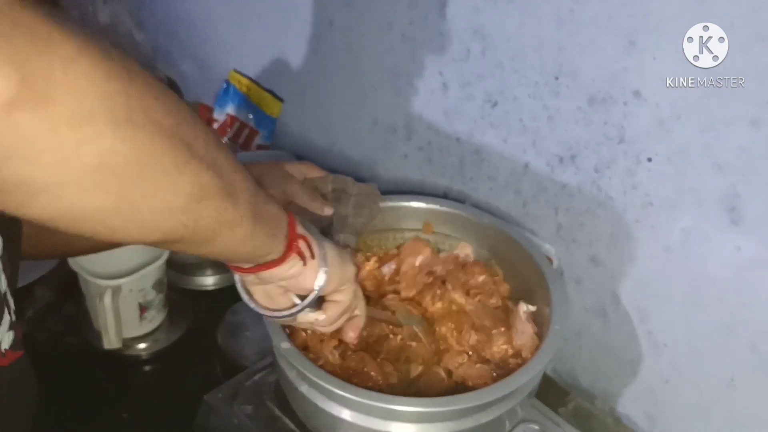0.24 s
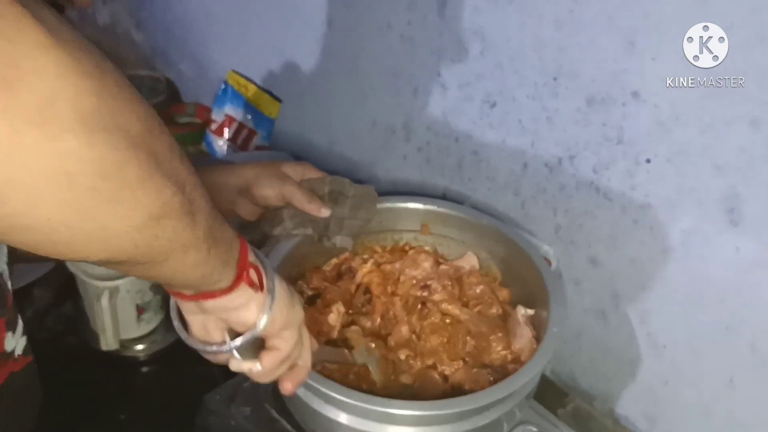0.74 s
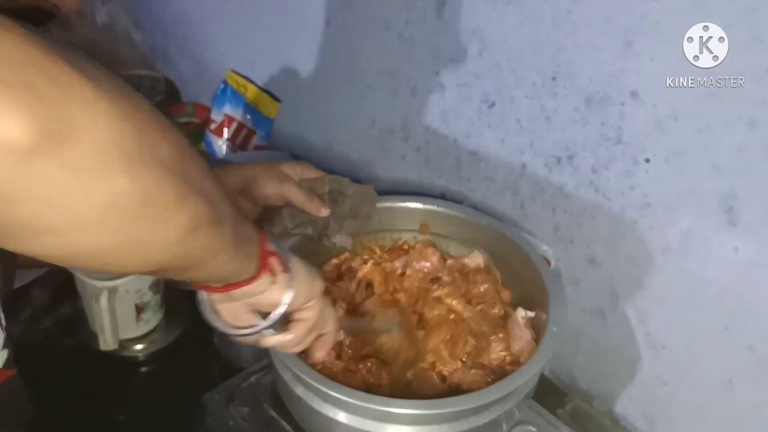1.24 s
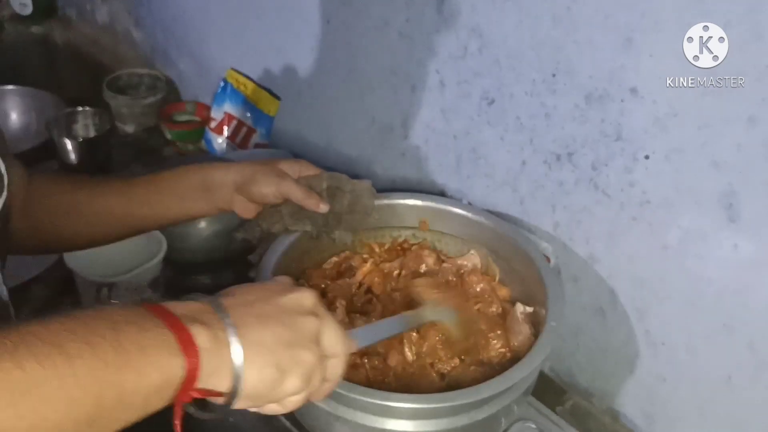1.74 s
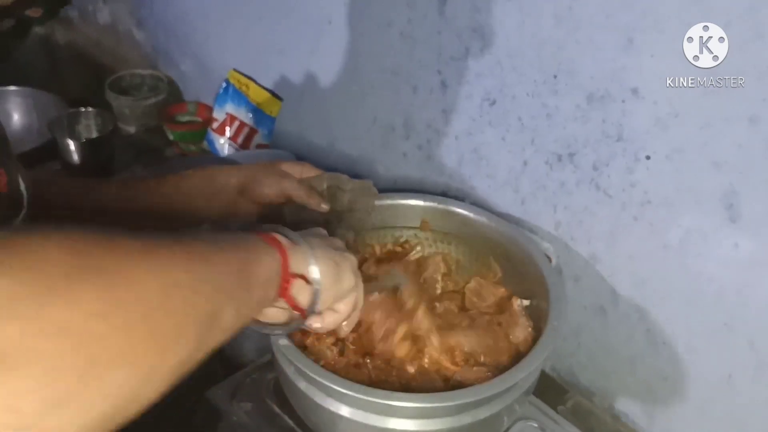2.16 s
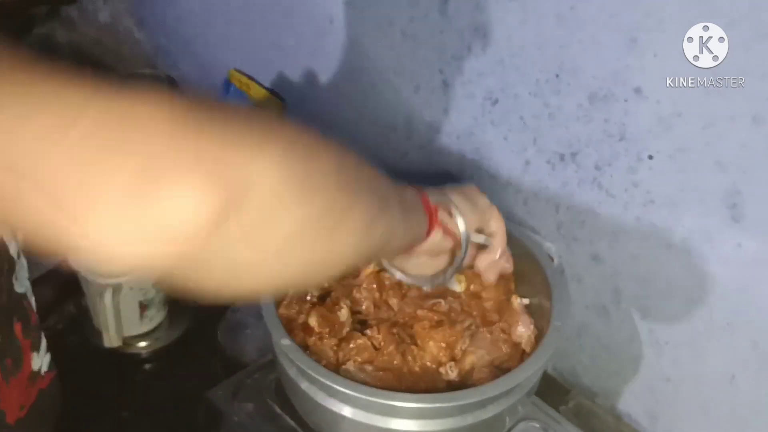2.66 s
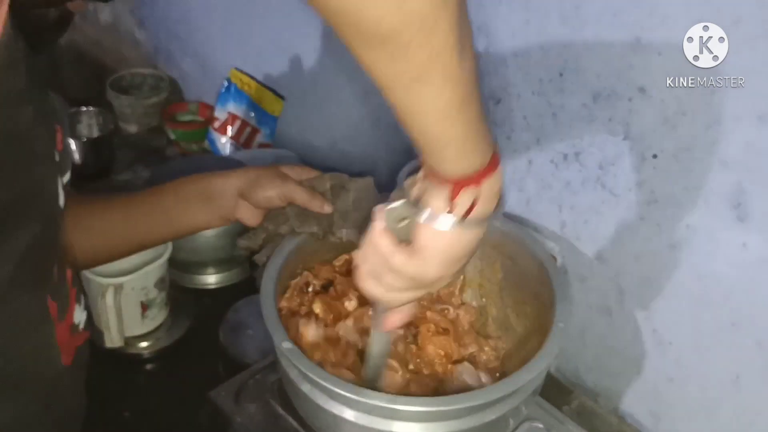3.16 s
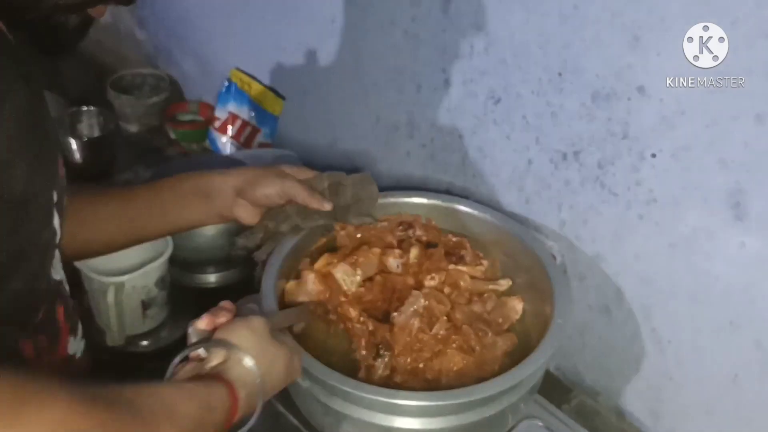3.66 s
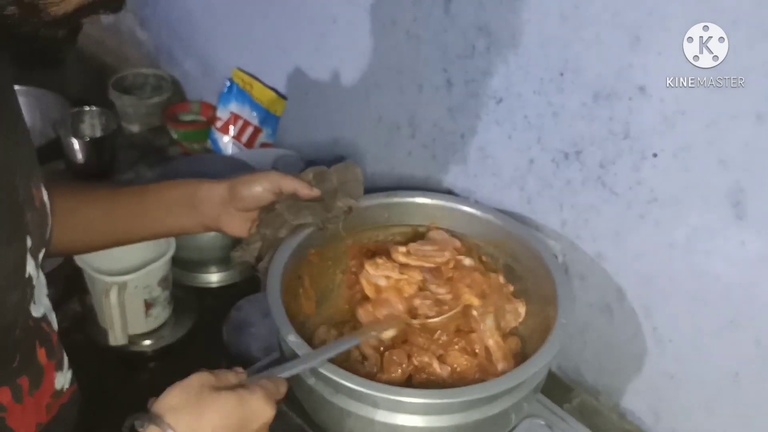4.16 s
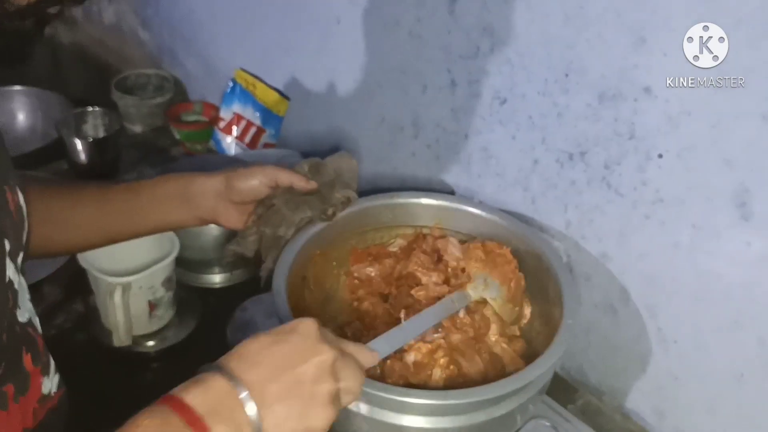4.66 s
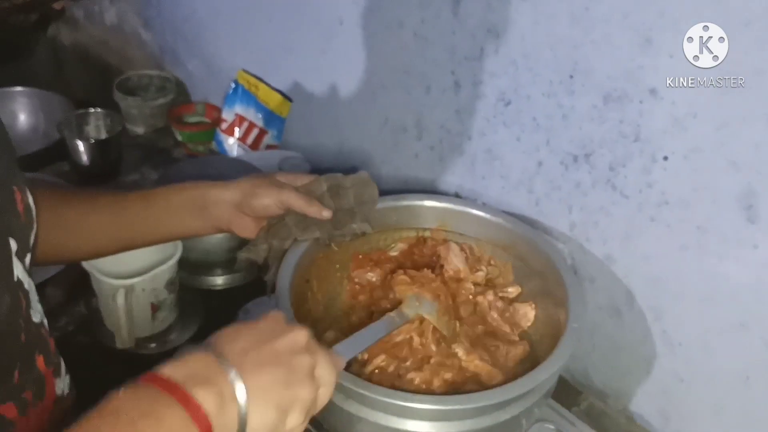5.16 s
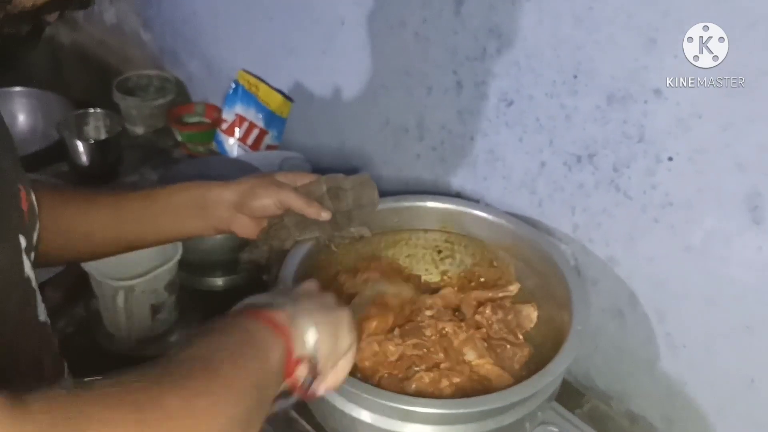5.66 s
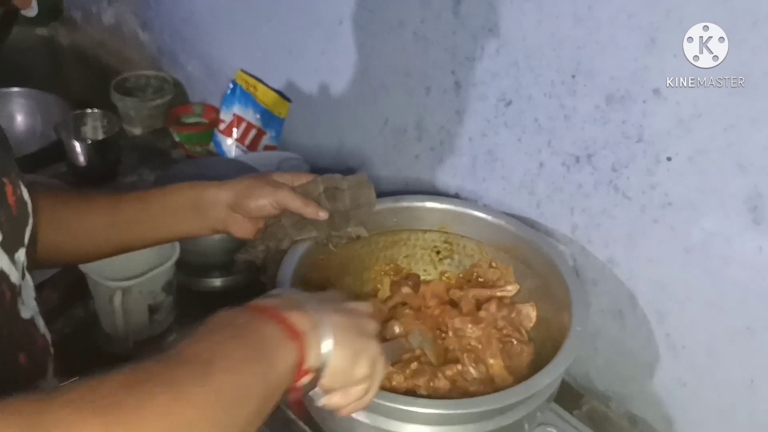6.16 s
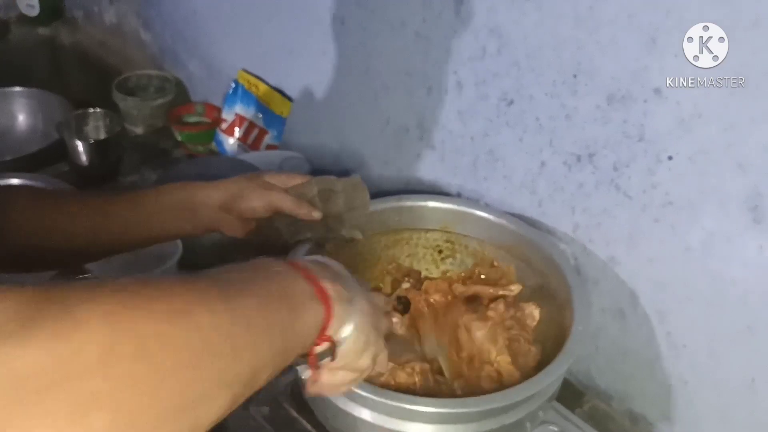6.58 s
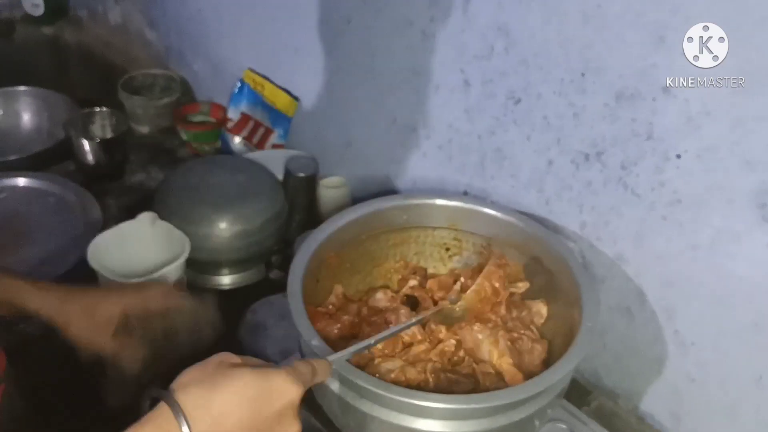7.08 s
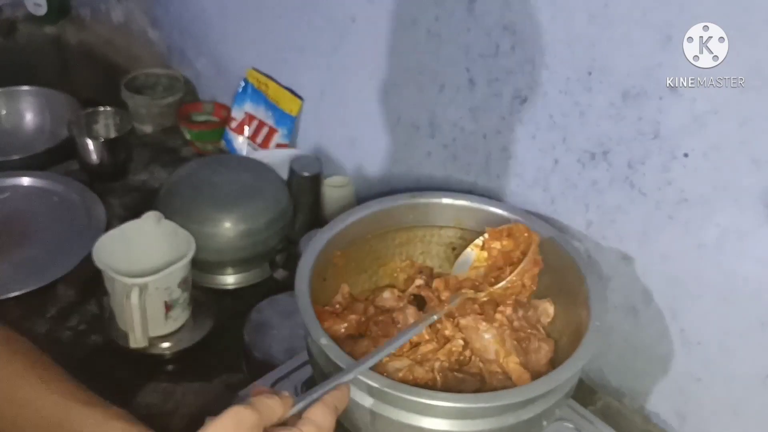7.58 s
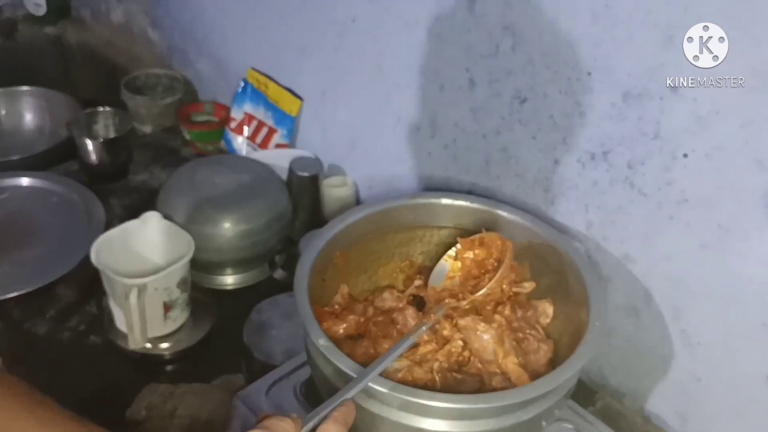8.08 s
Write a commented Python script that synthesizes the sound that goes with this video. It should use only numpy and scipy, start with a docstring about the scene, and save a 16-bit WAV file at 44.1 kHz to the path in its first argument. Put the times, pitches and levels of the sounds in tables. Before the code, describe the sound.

Brisk metallic scraping and clanks as saucy meat is stirred in a large pot, with wet smacks, easing to near quiet in a small kitchen.

```python
"""Ladle stirring a pot of chicken

A steel ladle stirs wet chicken pieces round a large aluminium pot in a small, hard-walled kitchen.
Its edge grates (stick-slip clicks through the pot's modes), clinks and knocks on the wall (struck modes, rattle).
The sauce squelches and smacks (pops of rising pitch); the dragged bowl sings (friction-driven resonances).
At the end the ladle is laid on the food, over a faint simmer (shaped noise and crackle)."""
import sys
import numpy as np
from scipy import signal
from scipy.io import wavfile
from scipy.ndimage import uniform_filter1d

SR = 44100
rng = np.random.default_rng(int(sys.argv[2]) if len(sys.argv) > 2 else 0)


def transcribe(u):
    """Save the signal u as a 16-bit wav file named by the first command-line argument.

    u: samples, shape (n,) or (channels, n), limited to [-1, 1]; the rate is SR.
    q: integer samples, one column per channel.
    """
    v = np.clip(np.atleast_2d(u).T, -1, 1)
    q = np.round(v * 32767).astype(np.int16)
    wavfile.write(sys.argv[1], SR, q)


N = 367353
TIME = np.arange(N) / SR
RING = np.arange(SR // 2) / SR

# ladle against pot wall: t/s, rasp level/dB, boom re rasp/dB, edge re rasp/dB, thud f/Hz,
# rattle re blow/dB, rattle decay/s, rise/s, treble limit f/Hz, wall clang re rasp/dB
KNOCKS = [(0.091, -37, -14, 4, 490, 2, 0.031, .0003, 13000, -17),
          (2.190, -38, -25.5, 8.5, 930, -8.5, 0.017, 0.00041, 5850, -23),
          (2.3671, -40, 0, 7.5, 900, -20, 0.033, 0.00058, 4800, -23.5),
          (2.729, -29, -3, 9, 303, 1.5, 0.069, 0.00014, 12000, -6),
          (3.474, -24.5, -0.5, 0.5, 890, -29.5, .01, 0.0001, 7500, -18),
          (4.023, -47, 4, -21, 414, 3, 0.0093, 0.00078, 4970, -31),
          (4.536, -40.5, -9, -2.5, 685, -20, 0.01, .0005, 5030, -16.5),
          (5.22, -33, -2, -7.5, 670, 6, 0.024, .0006, 4930, -10),
          (6.2629, -37.5, -7.5, 6, 740, 0, 0.044, 0.00067, 4940, -16),
          (6.335, -28, 8, -12.5, 433, -9.5, 0.0067, 0.0018, 6000, -18.5),
          (6.6944, -28.5, 2.5, -6, 323, 0, 0.051, 0.0037, 10460, -6),
          (6.997, -47.5, -13, 0, 800, 0, 0.014, .0004, 7000, -10.5),
          (7.6979, -39, -0.5, -1, 328, -3, 0.021, 0.004, 5600, 0.5),
          (8.055, -53.5, -2, -4, 950, 4, 0.041, 0.0031, 3620, 1)]
# ladle modes: f/Hz, level/dB, t60/s
LADLE_MODES = [(3090, -25.5, 0.13), (3680, -9, 0.021), (4050, 7, 0.0089), (4413, 15, 0.0056),
               (4520, 1.5, 0.0038), (5670, -22, 0.067), (6800, -14, 0.0079), (9380, -18.5, 0.016),
               (8890, -11.5, 0.018), (12650, -41.5, 0.07)]


def gain_of(db):
    """Decibels to gain."""
    return 10 ** (np.asarray(db) / 20)


def evened(x):
    """Scales to rms 1."""
    return x / np.sqrt(np.mean(x ** 2) + 1e-20)


def read(points, hz):
    """Reads a curve on a log-frequency axis."""
    f, value = np.transpose(points)
    return np.interp(np.log(hz + 1), np.log(f + 1), value)


def add(mix, s, sound):
    """Adds a sound at time s."""
    part = mix[max(round(s * SR), 0):][:len(sound)]
    part += sound[:len(part)]


def through(x, response):
    """Convolves and keeps the length."""
    return signal.oaconvolve(x, response)[:len(x)]


def click(colour, size=4096):
    """Causal minimum-phase click whose level in dB is colour(Hz)."""
    hz = abs(np.fft.fftfreq(size, 1 / SR))
    log_gain = np.log(gain_of(np.maximum(colour(hz), -110)))
    spectrum = np.exp(np.conj(signal.hilbert(log_gain)))
    return np.fft.ifft(spectrum).real[:size // 2]


def flutter(db, size):
    """Random gain, sd db, interpolated between new values every size samples."""
    knots = np.arange(0, N + size, size)
    values = gain_of(db * np.clip(rng.standard_normal(len(knots)), -2, 2))
    return np.interp(np.arange(N), knots, values)


def grains(per_s, spread_db):
    """Random clicks with exponentially spread dB levels, rms 1 overall."""
    place, size, sign = rng.random((int(per_s * N / SR) + 1, 3)).T
    height = gain_of(spread_db * np.minimum(-np.log(1 - size), 4)) * np.sign(sign - .5)
    return evened(np.bincount((place * N).astype(int), height, N))


def chatter(decay_s, rise_s=0.0013):
    """A dying rattle of tiny contacts, as enveloped noise."""
    envelope = np.exp(-RING / max(decay_s, 1e-4)) * (1 - np.exp(-RING / rise_s))
    return rng.standard_normal(len(RING)) * envelope


def mode(hz, t60):
    """One dying vibration."""
    return np.exp(-np.log(1000) * RING / t60) * np.cos(2 * np.pi * hz * RING)


def struck(modes, split=0, count=1):
    """Modes of one object with random signs; an uneven wall splits each into a few close ones."""
    total = 0
    for hz, db, t60 in modes:
        for _ in range(count):
            sign = np.sign(rng.random() - .5)
            total = total + sign * gain_of(db) * mode(hz * (1 + split * rng.uniform(-1, 1)), t60)
    return total / np.sqrt(count)


def rung(x, hz, width_hz):
    """One broad resonance."""
    return signal.lfilter(*signal.iirpeak(min(hz, SR / 3), hz / width_hz, fs=SR), x)


def fuzzy_tone(drive, hz, width_hz):
    """A resonance kept going by friction: double complex pole, rms 1."""
    r = np.exp(-np.pi * width_hz / SR + 2j * np.pi * hz / SR)
    return evened(signal.lfilter([1], np.poly([r, r]), drive).real)


def singing(hz, waver, size=500):
    """A clean tone whose pitch wavers a little."""
    drift = np.log(flutter(20 / np.log(10), size))
    return np.sqrt(2) * np.sin(2 * np.pi * np.cumsum(hz * (1 + waver * drift)) / SR)


def pop(hz, cycles, swell=1.0):
    """A short blip: a few cycles of rising pitch that swell and die, peak 1."""
    turns = hz * RING[:2000]
    dying = np.exp(-turns / cycles)
    swelling = 1 - np.exp(-turns / (swell * cycles))
    wave = dying * swelling * np.sin(2 * np.pi * turns * (1 + 0.054 * (1 - dying)))
    return wave / abs(wave).max()


def pushes(rows, attack_s, release_s, sag_db_per_s=4.5):
    """Gain of pushes (t/s, length/s, level/dB): each builds up, eases as the food gives way, lets go."""
    out = np.zeros(N)
    for s, length, db in rows:
        t = np.arange(0, length + 8 * release_s, 1 / SR)
        hold = gain_of(db - sag_db_per_s * t)
        release = np.exp(-np.maximum(t - length, 0) / release_s)
        add(out, s, hold * np.minimum(t / attack_s, 1) * release)
    return out


def stirring_force():
    """Force of the strokes on boom, rasp and bright edge: quick to and fro, then slow sweeps."""
    # t/s, length/s, rasp level/dB, boom re rasp/dB, edge re rasp/dB
    strokes = [(0.0, 0.087, -29, 1.5, -4), (0.142, 0.067, -26, 1, -5.5), (0.286, 0.07, -28, -4.5, -4),
               (0.38, 0.11, -37.5, 6, -5.5), (0.478, 0.078, -31, -3.5, -3.5), (0.607, 0.048, -32, 1.5, -3),
               (0.672, 0.02, -25.5, 1.5, -6.5), (0.733, 0.027, -34, 5, -2), (0.805, 0.075, -31, 2, -9.5),
               (0.961, 0.12, -31, 1.5, -3.5), (1.099, 0.091, -30, 0, -3), (1.256, 0.17, -31.5, 0, -1),
               (1.419, 0.049, -27.5, -1, -11), (1.526, 0.071, -30.5, -3, -5), (1.616, 0.041, -49, 11.5, -9),
               (1.679, 0.042, -39, 3, -6), (2.057, 0.15, -49.5, -16.5, 5.5), (2.221, 0.13, -47.5, 2.5, 5),
               (2.383, 0.079, -56, 9.5, 5), (2.906, 0.12, -43, 8, 8.5), (3.015, 0.04, -45.5, 13, 16),
               (3.047, 0.092, -41.5, 11, 2.5), (3.146, 0.12, -36.5, 9.5, 7.5),
               (3.301, 0.099, -39.5, 9, 10.5), (3.375, 0.03, -38.5, 10, -9), (3.42, 0.19, -33, 1.5, -1.5),
               (3.635, 0.46, -50, 4, 4.5), (4.073, 0.39, -44, 6, -1.5), (4.376, 0.11, -49.5, -15, 2),
               (5.124, 0.073, -62.5, -12, 12), (5.223, 0.078, -48, 13.5, 7), (5.579, 0.38, -48.5, 0, 4.5),
               (5.697, 0.025, -45.5, 8, -14.5), (5.802, 0.1, -72, -6, 22), (6.475, 0.12, -41, -3, -2),
               (6.712, 0.063, -48, 16.5, 8.5), (6.85, 0.081, -64.5, 1, 13)]
    s, length, db, boom_db, edge_db = np.transpose(strokes)
    return [pushes(zip(s, length, db + part), attack_s=0.02, release_s=0.026)
            for part in (boom_db, 0, edge_db)]


def pot_voices(low_hz=1000, high_hz=2800):
    """The pot's answer to one tap, split into boom, rasp and edge, each of energy 1."""
    # loaded pot modes: f/Hz, height/dB, t60/s
    pot_modes = [(121, 19, 0.39), (272.7, 9.5, 0.45), (345.6, 3.5, 0.19), (410.3, 2.5, 0.074),
                 (508.5, 3.5, 0.34), (608, 4.5, 0.44), (834, 1.5, 0.035), (1000, -8, 0.19),
                 (1346, -9.5, 0.082), (2294, 1.5, 0.13)]
    # colour of steel on aluminium: f/Hz, level/dB
    contact_colour = [(30, -41), (90, -22), (190, -3), (290, 2), (420, 1), (620, -3.5), (950, -1.5),
                      (1500, 0.5), (3100, -3), (4350, 3.5), (5300, -8.5), (7200, -10), (9500, -28.5),
                      (14000, -38.5)]
    ring = sum(gain_of(db) * 2 * np.log(1000) / (t60 * SR) * mode(hz, t60) for hz, db, t60 in pot_modes)
    ring[0] += 1  # direct tap

    def below(f, corner, order=8):
        """Low-pass power share."""
        return 1 / (1 + (f / corner) ** order)

    shares = [lambda f: below(f, low_hz),
              lambda f: below(f, high_hz) * (1 - below(f, low_hz)),
              lambda f: 1 - below(f, high_hz)]
    voices = [through(ring, click(lambda f: read(contact_colour, f) + 10 * np.log10(share(f) + 1e-12)))
              for share in shares]
    return [v / np.linalg.norm(v) for v in voices]


def scraping(voices, forces, boom_db=-1.0, rasp_db=0.0, edge_db=0.0,
             uneven_db=1.5, wander_db=6, pitched=0.72, clump_db=1.5):
    """The edge sticks and slips in clumps; as the contact shifts, each clump favours other pitches."""
    slips = evened(grains(per_s=1100, spread_db=3.8) * flutter(uneven_db, size=300))
    shifting = np.zeros(N)
    for hz in np.geomspace(250, 11000, num=24):
        clumps = grains(per_s=380, spread_db=4) * flutter(wander_db, size=700)
        shifting += rung(clumps, hz, 40 + .07 * hz)
    shifting = shifting * flutter(clump_db, size=260)
    out = np.zeros(N)
    for voice, force, db in zip(voices, forces, (boom_db, rasp_db, edge_db)):
        level = np.std(through(shifting[:N // 2], voice))
        drive = np.sqrt(1 - pitched) * slips + np.sqrt(pitched) * shifting / level
        out += gain_of(db) * through(drive * force, voice)
    return out


def knocking(voices, contact_s=.0042, rebound_s=0.011, blow_s=0.022, thud_width_hz=350,
             rattle_boom_db=3.5, clang_rise_s=.003, clang_split=.04, uneven_db=2.0):
    """Blows land, rebound and rattle; the wall clangs; food in the way slows and dulls the contact."""
    # bare wall above the food: f/Hz, level/dB, t60/s
    wall_modes = [(607, -10.5, .25), (915, -10.5, 0.37), (1088, -4.5, 0.47), (1374, -4, 0.41),
                  (1620, -11.5, 0.24), (2025, 1.5, 0.24), (2196, 0.5, 0.38), (2400, -5, 0.22),
                  (2620, -0.5, 0.21), (3200, -9.5, .18), (4650, -11, .15), (5050, -7, 0.27)]
    out = np.zeros(N)
    for s, db, boom_db, edge_db, thud_hz, rattle_db, rattle_s, rise_s, top_hz, clang_db in KNOCKS:
        cushion = signal.butter(4, min(top_hz, SR / 3), fs=SR)
        touches = [(0, contact_s, 0, 0), (rebound_s, rattle_s, rattle_db, rattle_boom_db)]
        for delay, decay_s, touch_db, heavy_db in touches:
            unevenness = flutter(uneven_db, size=260)[:len(RING)] if delay else 1
            contacts = signal.lfilter(*cushion, chatter(decay_s, rise_s) * unevenness)
            # landing place sets the thud pitch
            drives = [contacts + 2 * rung(contacts, thud_hz, thud_width_hz), contacts, contacts]
            for drive, voice, part_db in zip(drives, voices, (boom_db + heavy_db, 0, edge_db)):
                blow = through(drive, voice)
                blow *= np.sqrt(blow_s * SR) / np.linalg.norm(blow)
                add(out, s + delay, gain_of(db + touch_db + part_db) * blow)
        clang = struck(wall_modes, clang_split, count=8) * (1 - np.exp(-RING / clang_rise_s))
        add(out, s, gain_of(db + clang_db) * clang)
    return out


def heaving(level_db=1, hz=215, t60=0.095, full_db=-21, steep=3.3, rise_s=0.0058):
    """Heavy blows also shove the whole loaded pot: one short, deep thump."""
    out = np.zeros(N)
    high_pass = signal.butter(3, 0.34 * hz, "high", fs=SR)
    thump = signal.lfilter(*high_pass, mode(hz, t60) * (1 - np.exp(-RING / rise_s)))
    for s, db, boom_db, *_ in KNOCKS:
        add(out, s, gain_of(level_db + full_db + steep * (db + boom_db - full_db)) * thump)
    return out


def clinking(voices, level_db=-1, rebound_s=0.0044, rebound=0.37, crack_s=0.0044, rim_hz=6660, rim_t60=0.13):
    """The caught edge rings the ladle, cracks on the pot and rebounds once; sauce damps it quickly."""
    # t/s, level/dB, rim ping/dB, crack re ring/dB
    clinks = [(0.277, -20.5, -31.5, -9), (0.728, -1.5, -44.5, -12), (1.052, -6, -16, -7),
              (1.1205, -10, -35, -5), (1.3512, -3, -12.5, -4), (3.23, -24.5, -45, -3),
              (3.2417, -10.5, -38.5, 2.5), (3.311, -12.5, -26, 5.5), (6.15, -28.5, -36.5, -17),
              (6.261, -26.5, -35.5, 3)]
    out = np.zeros(N)
    for s, db, ping_db, crack_db in clinks:
        ring = struck(LADLE_MODES) + gain_of(ping_db) * mode(rim_hz, rim_t60)
        ring *= 1 - np.exp(-RING / 0.0009)
        crack = through(chatter(crack_s), voices[2] + .5 * voices[1])
        hit = ring / abs(ring).max() + gain_of(crack_db) * crack / abs(crack).max()
        hit *= gain_of(db + level_db) / abs(hit).max()
        add(out, s, hit)
        add(out, s + rebound_s, rebound * hit * np.exp(-RING / 0.0051))
    return out


def skidding(voices, level_db=0, grit_db=-3):
    """The edge skids over bare metal: a fast run of slips rings the ladle and grates on the pot."""
    # t/s, length/s, level/dB
    skids = [(0.0, 0.02, -24), (0.325, 0.035, -45.5), (0.687, 0.008, -37.5), (0.709, 0.004, -32),
             (1.4, 0.013, -36), (2.936, 0.012, -27.5), (3.2, 0.012, -32.5), (6.543, 0.012, -40.5),
             (6.672, 0.014, -42)]
    ring = struck(LADLE_MODES) * (1 - np.exp(-RING / .001)) ** 2
    slips = grains(per_s=1800, spread_db=2.5) * pushes(skids, attack_s=.003, release_s=.004)
    return gain_of(level_db) * through(slips, ring / np.linalg.norm(ring) + gain_of(grit_db) * voices[2])


def thinned_when_faint(x, full_db, slope, corner_hz=5000, deep_hz=210, deep_slope=.6):
    """Faint contact sounds duller and thinner: top treble and deepest boom fade as the level falls."""
    dull = signal.sosfiltfilt(signal.butter(6, corner_hz, fs=SR, output="sos"), x)
    deep = signal.sosfiltfilt(signal.butter(4, deep_hz, fs=SR, output="sos"), x)
    local_rms = np.sqrt(abs(uniform_filter1d(x ** 2, size=400)) + 1e-14)
    level = np.minimum(local_rms / gain_of(full_db), 1)
    return dull - deep + (x - dull) * level ** slope + deep * level ** deep_slope


def rubbing(drag_db=-2, moan_db=-1, bump_db=0, moan_hz=634, firm_db=-35, firm_above_hz=2500,
            firm_slope=0.19, wander_db=2.0, rough_db=-0.5):
    """Fine slips of the flat bowl make the metal sing, its high notes growing with pressure; the pot moans and bumps."""
    # bowl dragged flat: t/s, length/s, level/dB
    drags = [(1.93, 0.2, -51), (4.135, 0.07, -27), (4.2, 0.21, -33.5), (4.35, 0.08, -31),
             (4.98, 0.217, -48.5), (6.0, 0.31, -56)]
    # resonances it sings with: f/Hz, pole width/Hz, level/dB
    drag_tones = [(497, 94, -0.5), (843, 57, -6.5), (1373, 80, 0), (1580, 90, 1), (1827, 54, 0.5),
                  (1965, 83, 0), (2250, 150, -5), (2790, 280, -1.5), (3110, 45, -5), (3930, 400, 1),
                  (4450, 200, -1), (4910, 150, -7.5), (5840, 96, -15), (6730, 230, -12), (7200, 330, -19.5),
                  (8700, 400, -27.5), (9660, 400, -28)]
    # short rubbed moan of the pot: t/s, length/s, level/dB
    moans = [(4.42, 0.16, -53), (5.055, 0.062, -46.5), (5.96, 0.33, -60.5)]
    # low bump as the pot shifts, or hum after a heavy blow: t/s, length/s, level/dB, f/Hz
    bump_rows = [(4.131, 0.015, -44.5, 71.6), (5.255, 0.13, -49, 122)]
    pressure = pushes(drags, attack_s=0.065, release_s=0.017)
    firmness = np.minimum(pressure / gain_of(firm_db) + 1e-9, 1) ** firm_slope
    slips = grains(per_s=1500, spread_db=1.5)
    low, high = np.zeros(N), np.zeros(N)
    for hz, width_hz, db in drag_tones:
        band = low if hz < firm_above_hz else high
        band += gain_of(db) * fuzzy_tone(slips * flutter(wander_db, size=900), hz, width_hz)
    drag = (low + firmness * high * flutter(rough_db, size=200)) / np.std(low + high)
    moan = singing(moan_hz, waver=0.009, size=260) * pushes(moans, attack_s=0.031, release_s=0.032)
    bumps = sum(singing(hz, waver=0.042) * pushes([row], attack_s=0.014, release_s=0.012)
                for *row, hz in bump_rows)
    return gain_of(drag_db) * drag * pressure + gain_of(moan_db) * moan + gain_of(bump_db) * bumps


def smacking(level_db=0, spray=0.25, spray_s=0.0019):
    """Pieces part with wet smacks: larger pops, each with a spray of finer crackle."""
    # t/s, level/dB, f/Hz, ring/cycles
    smacks = [(0.234, -32.5, 9400, 1.8), (2.080, -29, 5950, 3.2), (2.173, -22, 1750, 1.7),
              (2.329, -22.5, 4050, 0.83), (2.383, -25.5, 840, 3.6), (2.471, -30, 1240, 1.3),
              (3.775, -24, 2600, 0.46), (4.694, -44, 3310, 3.8), (5.337, -32, 4250, 3.1),
              (5.5, -34, 2920, 0.56), (5.589, -29, 3780, 2.9), (5.6034, -29, 1580, 1.1),
              (5.694, -37, 830, 1.8), (5.757, -25.5, 1870, 1.9), (5.778, -21.5, 3940, 0.7),
              (5.829, -23.5, 4140, 1), (5.911, -40.5, 880, 2.9), (5.927, -35.5, 3940, 3.3),
              (5.946, -34, 3940, 1.6), (6.030, -38, 2400, 1.4), (6.069, -49, 6680, 11),
              (6.489, -33, 4050, 3.9), (6.871, -41, 6170, 7), (6.936, -46, 6170, 5.4),
              (7.007, -52, 6980, 17), (7.065, -36, 3570, 1.8), (7.113, -51, 4080, 4),
              (8.233, -52.5, 3890, 5.3)]
    out = np.zeros(N)
    for s, db, hz, cycles in smacks:
        bursts = spray * chatter(spray_s)[:4000]
        bursts[0] += 1
        high_pass = signal.butter(2, .4 * hz, "high", fs=SR)
        wave = signal.lfilter(*high_pass, through(bursts, pop(hz, cycles)))
        add(out, s, gain_of(db + level_db) * wave / abs(wave).max())
    return out


def squelching(boom, edge, level_db=-19, follow=0.7, per_s=16, glug_db=-12):
    """Small bubbles burst while the food is moved, and larger pockets of air glug under it."""
    bubbles = sum(through(grains(per_s, spread_db=4.5), pop(hz, cycles=3.5)) * np.sqrt(hz)
                  for hz in np.geomspace(1300, 4600, num=7))
    soft = signal.lfilter(*signal.butter(2, 5500, fs=SR), bubbles)
    glugs = sum(through(grains(per_s=2.7, spread_db=2.0), pop(hz, cycles=2.2)) * np.sqrt(hz)
                for hz in np.geomspace(280, 950, num=5))
    glugs = signal.lfilter(*signal.butter(2, 220, "high", fs=SR), glugs)
    return gain_of(level_db) * evened(soft) * edge ** follow + gain_of(glug_db) * evened(glugs) * boom


def high_pips(edge, level_db=-34, follow=0.74, per_s=15):
    """Sparse, randomly placed high pips that rise and fall with the bright edge of the scraping."""
    pips = sum(through(grains(per_s, spread_db=4), pop(hz, cycles=8)) / hz ** 2
               for hz in np.geomspace(6000, 14500, num=14))
    pips = signal.lfilter(*signal.butter(2, 5000, "high", fs=SR), pips)
    return gain_of(level_db) * evened(pips) * edge ** follow


def whistling():
    """Steam squeezes out between the pieces in thin, wavering jets."""
    # t/s, length/s, level/dB, f/Hz
    jets = [(8.15, 0.13, -70, 4840), (8.282, 0.033, -58, 3950)]
    return sum(singing(hz, waver=0.007) * pushes([row], attack_s=0.023, release_s=0.013)
               for *row, hz in jets)


def simmering(crackle=0.3, level_db=-68.5):
    """Faint sizzle over the hush of the room: coloured noise and grains."""
    # f/Hz, density/dB
    simmer_colour = [(20, -29), (90, -8), (200, -7.5), (344, -13.5), (558, -9), (900, -16), (1300, -14),
                     (4800, -23), (6000, -25), (15000, -37)]
    fizz = rng.standard_normal(N) + crackle * grains(per_s=250, spread_db=-1.0)
    return gain_of(level_db) * evened(through(fizz, click(lambda f: read(simmer_colour, f))))


def kitchen(x, early_db=-7, tail_db=-6, early_s=0.013, turns_per_s=1.7):
    """Reflections from pot and near wall, then the tail; three echo sets blend in rotation."""
    # tail decay: f/Hz, t60/s
    tail_t60 = [(150, 0.5), (400, .5), (1000, .5), (2800, 0.69), (7000, 0.76), (9000, 0.36), (14000, 0.88)]
    # tail colour: f/Hz, level/dB
    tail_colour = [(100, -3.5), (400, 3.5), (1200, -2), (4500, -7.5), (9000, -2)]
    out = x.copy()
    for k in range(3):
        sparse = rng.standard_normal(len(RING)) * (rng.random(len(RING)) < 4000 / SR)
        early = sparse * (RING > .003) * np.exp(-RING / early_s)
        hz, t, z = signal.stft(rng.standard_normal(len(RING)) * (RING > .008), SR, nperseg=256)
        decay = np.exp(-np.log(1000) * t / read(tail_t60, hz)[:, None])
        colour = gain_of(read(tail_colour, hz))[:, None]
        tail = signal.istft(z * decay * colour, SR, nperseg=256)[1][:len(RING)]
        echoes = gain_of(early_db) * early / np.linalg.norm(early)
        echoes = echoes + gain_of(tail_db) * tail / np.linalg.norm(tail)
        place = np.sqrt(2 / 3) * np.cos(2 * np.pi * (turns_per_s * TIME + k / 3))
        out += through(x * place, echoes)
    return out


def scene():
    """Ladle, pot and sauce in the kitchen."""
    voices, forces = pot_voices(), stirring_force()
    boom, _, edge = forces
    contact = scraping(voices, forces) + knocking(voices) + heaving() + clinking(voices) + skidding(voices)
    contact = thinned_when_faint(contact, full_db=-24.5, slope=0.47)
    wet = smacking() + squelching(boom, edge)
    stirring = contact + wet + high_pips(edge) + rubbing() + whistling()
    return (gain_of(-3.0) * kitchen(stirring) + gain_of(7.5) * simmering())[None]


def record(dry, knee_db=3, suppress_db=15.5, edge_hz=15800):
    """A noise suppressor turns down whatever is faint in each band; then the band limit."""
    # suppression threshold: f/Hz, density/dB
    threshold = [(60, -86.5), (130, -75.5), (280, -66.5), (600, -88.5), (1500, -93), (4000, -99),
                 (6000, -103), (9000, -104), (12000, -109)]
    frames = dict(nperseg=512, noverlap=384, scaling="psd")
    hz, t, z = signal.stft(dry, SR, **frames)
    power = uniform_filter1d(2 * abs(z) ** 2, size=3, axis=1)
    power = uniform_filter1d(power, size=5, axis=2)
    over_db = 10 * np.log10(abs(power) + 1e-20) - read(threshold, hz)[:, None]
    shut = .5 - .5 * np.tanh(over_db / (2 * knee_db))
    quieted = signal.istft(z * gain_of(-suppress_db * shut), SR, **frames)[1][:, :N]
    low_pass = signal.firwin(511, edge_hz, window=("kaiser", 9), fs=SR)
    return signal.oaconvolve(quieted, low_pass[None], "same")


dry = scene()
out = record(dry)
transcribe(out)
```